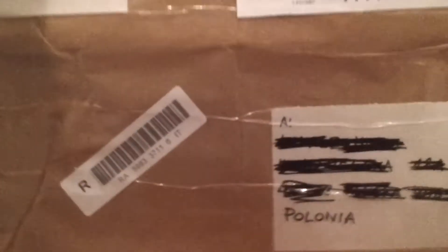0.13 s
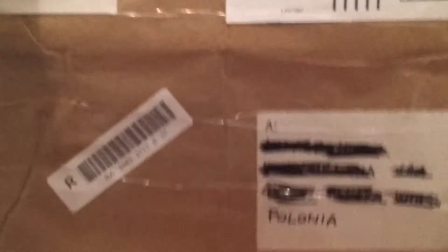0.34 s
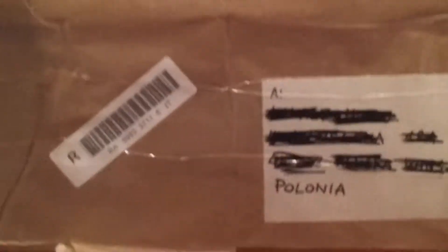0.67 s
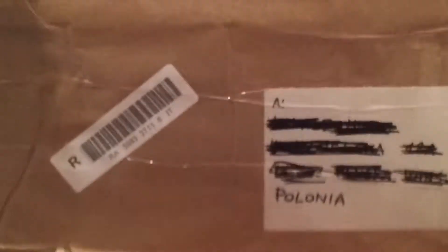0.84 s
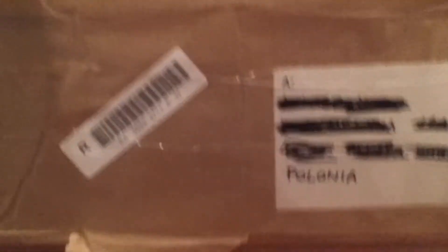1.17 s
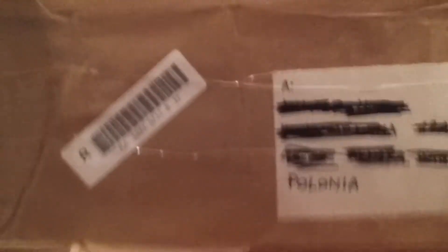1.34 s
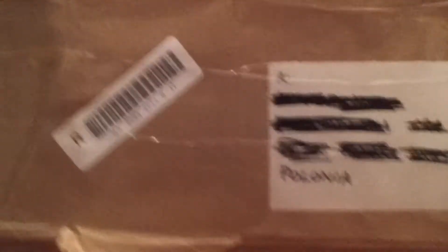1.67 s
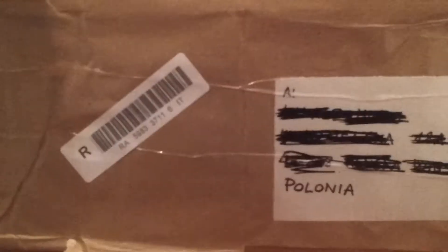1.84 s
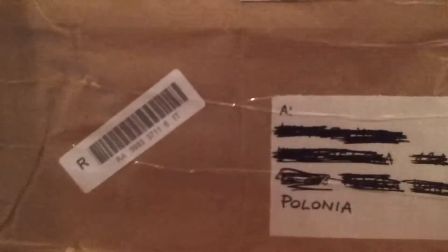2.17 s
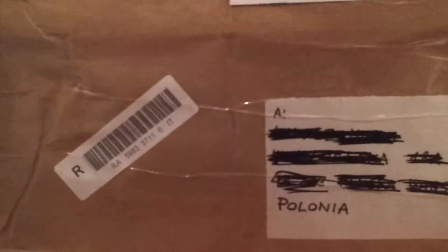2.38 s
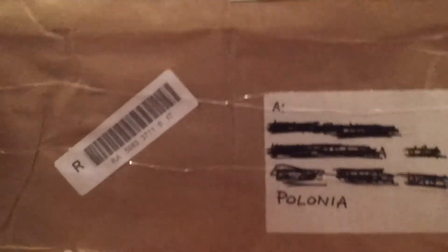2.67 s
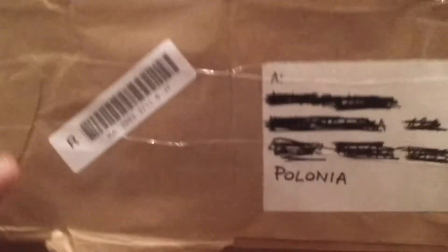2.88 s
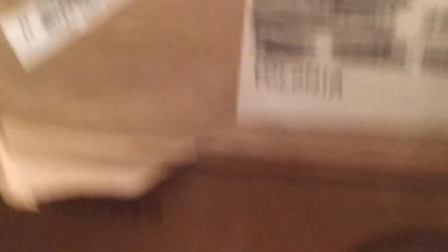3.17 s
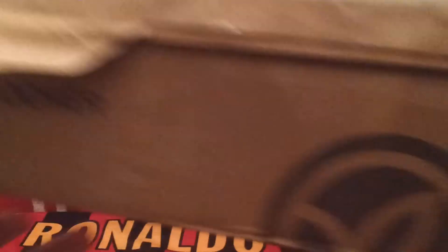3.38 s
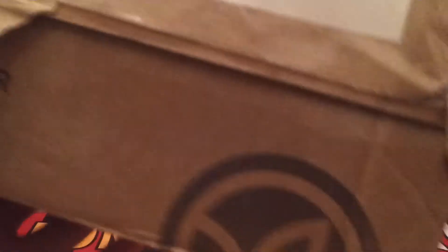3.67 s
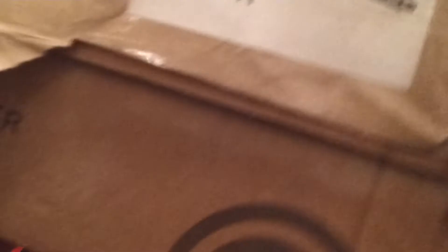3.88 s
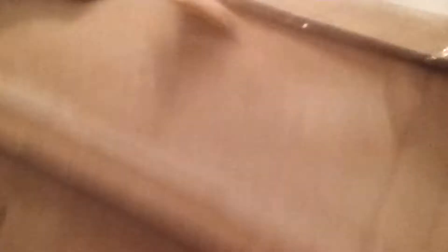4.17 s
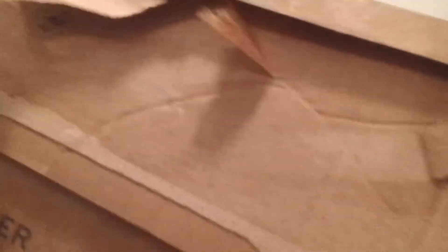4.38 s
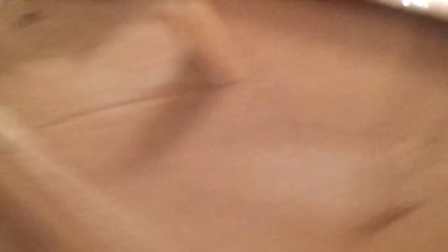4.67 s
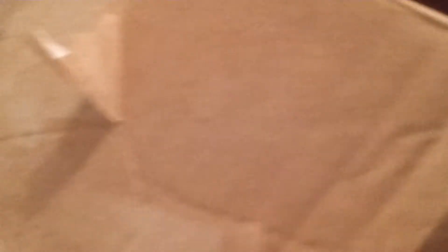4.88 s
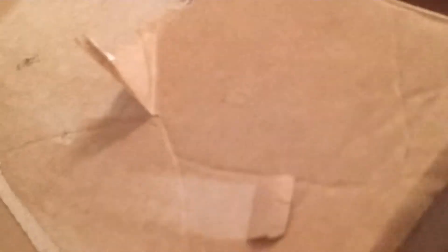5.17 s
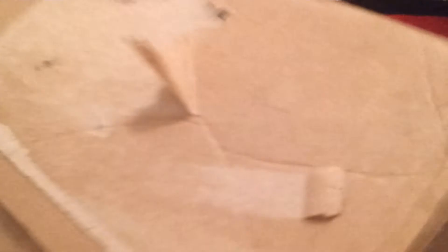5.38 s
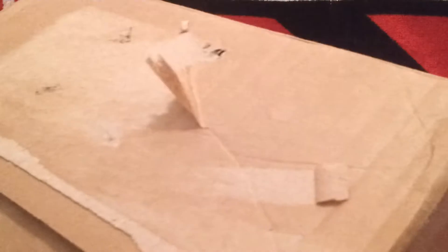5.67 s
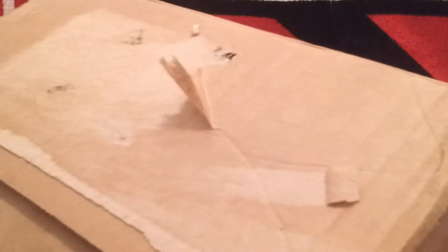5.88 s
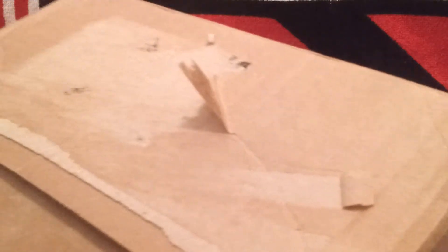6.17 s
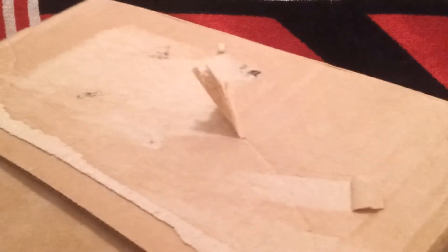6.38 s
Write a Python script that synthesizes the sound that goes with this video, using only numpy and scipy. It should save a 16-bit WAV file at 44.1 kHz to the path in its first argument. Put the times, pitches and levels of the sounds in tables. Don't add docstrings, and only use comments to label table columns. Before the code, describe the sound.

Hands pull tape and brown paper from a hollow box, heard close in stereo. Busy dry crackling opens, followed by separate snapping tugs, brittle pops and low, faint table bumps. A dense harsh rip arrives past the middle, then the crackle thins to a near lull, small high flicks tick, and two crisp cracks finish. Soft room noise and short hard echoes surround it.

```python
import sys
import numpy as np
from scipy import signal
from scipy.fft import rfft, irfft
from scipy.io import wavfile
from scipy.ndimage import uniform_filter1d

SR = 44100
rng = np.random.default_rng(int(sys.argv[2]) if len(sys.argv) > 2 else 0)


def linear_from_db(decibels):
    return 10 ** (np.asarray(decibels, float) / 20)


def to_wav(sig):
    pcm = np.clip(np.atleast_2d(sig), -1, 1) * 32767
    pcm = np.round(pcm).astype(np.int16)
    wavfile.write(sys.argv[1], SR, pcm.T)


N = 287840

# (time [s], crackle [dB], fade [dB/s], box over crackle [dB], tape fizz over crackle [dB])
TUGS = [(0.7298, -22, 130, -7, -31.5), (1.092, -16, 261.5, -4, -47), (1.157, -18.5, 145, -0.5, -35.5),
        (1.281, -18, 122, -6, -43), (1.4198, -24, 40, 1, -37), (1.507, -20, 165, 1, -38.5),
        (1.765, -23.5, 183, -1, -27.5), (1.9884, -16.5, 113, -14.5, -8.5), (2.0723, -19, 75, -20.5, -10),
        (2.2717, -24, 57, -11, -17), (2.424, -18, 20, -5.5, -16), (2.6162, -12, 82, -12.5, -28),
        (2.7803, -13, 200, -13, -22), (2.7935, -14, 170, -12, -22), (2.83, -14, 119, -7, -30),
        (2.845, -13.5, 150, -6.5, -25), (3.0095, -21.5, 118, -5.5, -41), (3.1332, -25.5, 183, 3, -21),
        (3.31, -14.5, 184, -26, -40), (3.59, -19.5, 44, -8, -23), (3.8778, -16, 140, -2, -32.5),
        (3.9788, -23, 4, -2.5, -15), (4.622, -19.5, 18, -5.5, -18), (4.11, -9, 30, -4, -8),
        (4.15, -9.5, 30, -5, -8), (4.684, -17.5, 13, -7, -1.5), (5.33, -32, 90, -7, -10),
        (5.545, -35, 90, 1, -15), (5.6036, -30, 63.5, -6, -10.5), (5.65, -33, 30, -6, -12),
        (5.712, -31, 120, -9, -4), (6.3096, -14.5, 81.5, -8, -36.5), (6.4373, -13, 150, -9.5, -17)]
# (time [s], swell [s], crackle [dB], fade [dB/s], tape fizz over crackle [dB])
PULLS = [(0.0, 0.01, -16.5, 38, -17), (.04, 0.032, -14.5, 32, -10), (0.124, 0.026, -21, 100, -17),
         (0.215, 0.024, -11, 27.5, -13), (.275, 0.027, -17.5, 19.5, -17), (.335, 0.056, -13, 43, -7),
         (.52, 0.033, -14, 92, -11.5), (0.84, 0.012, -15.5, -1, -16), (.868, 0.0087, -11.5, 250, -13),
         (.905, 0.0064, -14.5, 172, -10), (.995, 0.013, -17, 0, -3), (1.006, 0.014, -13, 129, -6.5),
         (1.605, 0.011, -23, 45, -16), (1.67, 0.008, -27, 161.5, -34), (1.945, 0.014, -20.5, 1, -13),
         (1.972, 0.013, -18, 0, -6), (2.45, 0.24, -15, 10, -57), (2.86, 0.027, -18.5, 44, -35.5),
         (3.15, 0.038, -27, 60, -10), (3.215, .02, -37, 44, -30), (3.338, .025, -21.5, 60, -0.5),
         (3.385, 0.012, -28.5, 154, -4), (3.535, 0.011, -34, 60, -3), (3.68, 0.015, -22.5, 120, -15),
         (3.745, 0.034, -23, 65, -6.5), (3.83, 0.054, -18, 0, -15), (3.93, .02, -22, 20, -29),
         (4.02, 0.0336, -18, 5, -8), (4.051, 0.0044, -7, 20, -5), (4.2, 0.12, -16.5, 2.5, -22),
         (4.543, 0.0083, -23, -2, -17), (4.81, 0.14, -22, 7, -7), (4.9, 0.12, -20.5, 18, 1),
         (5.055, 0.018, -17, 150, -4), (5.1, .015, -22, 98, -4.5), (5.95, 0.0137, -38.5, 15.5, 6.5),
         (6.09, 0.016, -33, 91, -1), (6.28, 0.0312, -27.5, 5, -12)]
TUG_SWELL_S, OPENING_DROP_DB = 0.00099, -3
PULL_BOX_DB, PULL_TAUT_DB, TUG_TAUT_DB = -8.5, -17, -26
FADE_SHARE = (0.9, 0.49, 1.03, 1, 4.4)
# (time [s], left-right [dB], nearness to box hollow [dB])
PLACE = [(0.0, -2, -19), (.5, -1.5, -9.5), (.9, -0.42, -6), (1.71, -0.5, -1.5), (2.07, 3, 6),
         (2.25, 9, 9.5), (2.45, 0.5, -5.5), (3.2, -1, -0.5), (3.45, 0, -27), (3.8, -2.5, 2),
         (3.9, -2, -6.5), (4.34, 1, -20), (4.58, -1, -8), (5.4, 0, -12), (6.29, 4, -23), (6.53, 0.5, -31.5)]
# (centre [Hz], width [Hz], level [dB])
SHEET = [(2025, 920, -1), (3280, 2700, -3.5), (4650, 2250, -1), (7560, 970, -12)]
# (centre [Hz], width [Hz], level [dB])
BOX_WALL = [(670, 79, -3), (869, 337, 2), (1100, 300, 0)]
# (centre [Hz], width [Hz], level [dB])
BOX_AIR = [(200, 72, -1), (310.4, 17, 14), (339, 290, -3), (353, 41, 10)]
# (centre [Hz], width [Hz], level [dB])
FIZZ = [(7400, 6800, 1.5), (13200, 1800, -5)]
# (centre [Hz], width [Hz], level [dB])
TAUT = [(4500, 2300, 0)]
# (frequency [Hz], density [dB/Hz])
HUSH = [(18, -53), (30, 19), (240, -4), (312, -1.5), (581, -5), (794, -1.5), (1200, -7.5), (4420, -7),
        (12200, -15.5), (15000, -16)]
HUSH_DB = -28
# (time [s], peak [dB], frequency [Hz], t60 [s])
HUMS = [(0.36, -11.5, 4620, 0.74), (1.508, -15, 2230, 0.11), (.53, -19, 878.6, 1),
        (2.785, -11, 1020, 0.076), (0.912, -14.5, 308, 0.36), (1.016, -10.5, 4600, 0.23),
        (2.08, -19, 1020, 0.41), (2.099, -20, 3980, 0.97), (2.277, -16.5, 1850, 0.392),
        (3.355, -8, 4460, 0.16), (3.615, -19, 1270, .15), (2.786, -13, 880, 0.1), (.875, -16, 4600, .08),
        (4.525, -9.5, 4300, 0.11), (4.06, -19, 294, 0.36), (3.601, -21, 1210, 0.325),
        (4.03, -17.5, 293, 0.29), (4.69, -13, 4800, 0.25), (6.32, -12, 960, 0.25), (3.855, -16, 310, 0.29),
        (4.686, -10, 4100, .25), (2.03, -23, 6300, 1.2), (2.28, -23, 2980, 0.37), (.052, -13.5, 4760, 0.34),
        (.735, -16, 2000, 0.14)]
# (time [s], peak [dB], frequency [Hz], t60 [s], left-right [dB])
FLECKS = [(.44, -2.5, 1810, 0.033, 1), (0.539, -11, 1100, .03, 0), (0.621, -9, 1900, .03, 0),
          (1.434, -4, 2000, 0.018, -2), (1.5083, -3, 1900, .015, -2), (1.622, -18, 7500, .03, 0),
          (1.655, -22, 8500, .03, 2), (1.835, -20, 6000, .02, 0), (1.888, -19.5, 6000, .02, 0),
          (1.984, -6.5, 9300, 0.026, -4), (2.858, -9, 1500, 0.023, -5), (2.9, -12, 1200, .03, 0),
          (3.3122, -1, 4670, 0.017, -3), (3.5917, -5, 3520, 0.016, -2), (1.0897, -0.5, 3500, .02, -6),
          (1.1588, -6, 1910, 0.034, -4), (3.1318, -1.5, 2360, .02, -7), (5.6057, -11.5, 2500, 0.028, 5),
          (6.049, -19, 1800, .01, 0), (4.482, -0.5, 4500, .012, -1), (4.77, -8, 8000, .03, -5),
          (5.6919, -20, 7500, .02, -5), (5.7136, -11.5, 7300, 0.044, -3), (6.0481, -12, 3960, 0.009, -4),
          (6.0885, -22, 7790, .02, -2), (6.1733, -19, 7120, .02, -3), (6.2167, -16, 7470, .025, -4),
          (6.3985, -10, 8300, 0.018, -2), (.7312, -8, 2400, .025, -2), (2.2628, -8, 9000, 0.011, 6),
          (2.2628, -7, 3580, .01, 9), (2.274, -7.5, 2180, 0.013, 7), (2.274, -14, 8000, .012, 8),
          (2.4089, -5, 8000, .012, -2), (2.578, -10, 3000, .02, 0), (4.682, -2, 4100, .04, -4),
          (1.4182, -9, 3200, .02, -3.5), (2.545, -14, 6000, .015, 0), (2.779, -1, 5300, 0.028, 2),
          (2.619, -0.5, 2150, .05, -5)]
# (time [s], peak [dB], frequency [Hz])
BUMPS = [(0.6, -45, 117), (.85, -49, 105), (1.39, -46, 105), (1.003, -21.5, 178.7), (1.448, -30.5, 176),
         (1.988, -36.5, 156), (2.618, -34.5, 200), (3.129, -44, 105), (3.329, -49, 198.4),
         (4.051, -42, 123), (4.108, -33, 191), (4.478, -54, 198), (5.051, -58, 187)]
# (time [s], length [s], level [dB], frequency [Hz])
STIRS = [(0.663, .1, -60, 80), (1.03, 0.33, -53, 80), (1.44, 0.27, -54, 70), (1.78, 0.11, -56, 70),
         (1.94, .1, -48, 70), (2.24, .14, -54, 60), (2.4, .08, -54, 70), (2.592, .07, -46, 70),
         (2.76, .06, -59, 70), (2.99, .06, -54, 70), (3.107, .07, -48, 70), (3.276, .12, -58, 60),
         (3.618, 0.15, -70, 80), (3.85, .09, -56, 110), (4.043, 0.16, -49, 60), (4.45, .08, -58, 60),
         (4.627, .1, -60, 70), (5.01, 0.075, -49, 80), (5.13, 0.31, -58, 60), (5.84, 0.21, -61, 70),
         (6.282, .1, -55, 70), (6.398, .08, -60, 70), (.78, .14, -64, 80), (5.43, .12, -63, 70),
         (5.6, .2, -66, 80), (6.1, .15, -68, 70), (1.58, .1, -62, 90), (2.48, .1, -57, 80)]
# (time [s], peak [dB], sheet ring [Hz], room tail [dB], left-right [dB])
SNAPS = [(.7314, -4.5, 1870, 3.5, -1), (1.0953, -1, 2280, -3, 6), (1.1594, -1.5, 1770, -3, 1.5),
         (1.2835, -8, 2220, 4.5, 6), (1.4198, -8, 2110, 8.5, -3), (1.769, -10.5, 1950, 5, 0),
         (1.9889, 1.5, 2160, -4, -2), (2.0728, 0, 1700, -2.5, 1.5), (2.2631, -9, 3020, -19.5, 6.5),
         (2.4095, -11.5, 6260, -7, -15), (2.4272, 1, 3260, -2, -4), (2.6165, 5.5, 2070, -8, -3),
         (2.7814, -3, 1010, -10.5, 4.8), (3.0097, -2.5, 1485, 1.5, 1.5), (3.1322, -3, 1920, -1.5, 0),
         (3.3122, -4.5, 3850, -1, 3), (3.5925, -7.5, 1100, 5, -4), (3.8805, -1, 3420, -4, 1),
         (3.8954, 0, 1470, 5, -1), (4.0539, 7, 4180, -7, -7), (4.6832, -1, 4270, -10, -3),
         (5.6056, -8, 3400, -7, 7), (6.3116, -4.5, 3000, -9, 10), (6.4362, 0, 5070, 2.5, 3)]
# (time [s], peak [dB], sheet ring [Hz], left-right [dB])
CRACKS = [(0.8463, -19, 1000, -3), (1.39, -14, 980, 0), (2.794, -2.5, 4740, 2.36), (2.846, -11, 3500, -8),
          (0.877, -11, 4500, -9), (1.0895, -2, 2240, -1), (1.434, -8, 1010, 2), (1.453, -6.5, 1030, -1),
          (1.5078, -3, 1100, 2), (2.2742, -10.5, 1830, 16), (2.53, -3.5, 1690, -4.5),
          (2.574, -26, 2100, -1), (2.831, -6.5, 2150, -5), (2.9795, -8, 1060, -5), (3.576, -12.5, 1020, -2),
          (3.6476, -8, 4400, -1), (3.9787, -4.5, 1060, -1), (4.481, -9, 3080, -11.5), (4.507, -8, 3040, -8),
          (4.528, -13, 4350, -6), (4.624, -14.5, 4200, 2.5), (4.806, -0.5, 4630, -0.98),
          (5.069, -0.5, 4040, 8), (5.5493, -16, 1000, -7), (5.689, -21.5, 4920, 0.5),
          (5.7144, -17, 3000, -2.5), (6.049, -13.5, 3920, 0), (6.218, -21, 1150, -4.5),
          (6.3883, -7, 3380, 7), (6.398, -19.5, 1010, 6)]
CRACK_TAIL_DB, KNOCK_DB = 0.5, -7
# (time [s], peak [dB], left-right [dB])
POPS = [(1.284, -9, -1.5), (1.5075, -10, -3.0), (2.0737, -4, 0.0), (2.2628, -3, 10), (2.4089, -1, -1.0),
        (2.4444, -5, 3), (2.576, -8, 0.5), (2.7934, -3, 0.5), (2.8444, -2, 0.5), (3.5917, -7, -1.5),
        (3.6461, -6, -6), (4.4807, -2, 2), (4.5072, -5, -2.5), (4.5276, -4, -3), (5.7134, -17, -0.5),
        (6.0482, -8, -1.0)]
# (time [s], peak [dB], upper mode over lower [dB], ring t60 [s], left-right [dB])
TICKS = [
    (5.7994, -22, 6, 0.03, 5),
    (5.8144, -6.5, 1.5, 0.021, 0),
    (5.856, -16, -5, 0.04, 5),
    (5.9468, -16, -17, 0.045, 19),
    (5.966, -14.5, -2, 0.12, -4),
    (6.0013, -8, -17, 0.026, 17),
    (6.0294, -25, 2.5, 0.05, -3),
]
# (lower [Hz], upper [Hz])
TICK_HZ = (6630, 8220)
# (near scatter t60 [s], walls t60 [s], walls [dB], dulling [0-1], first echo [s])
ROOM = (0.36, 0.83, -8.5, 0.53, 0.02)
# (frequency [Hz], likeness [0-1])
SAME = [(60, 0.32), (150, 0.73), (300, 0.594), (600, 0.94), (1200, 0.22), (3000, 0.0084), (15000, 0.0067)]
# (frequency [Hz], left-right [dB])
LEAN = [(60, 3), (130, 4), (290, 2), (640, 0.5), (1400, 1), (3090, -0.5), (5600, 1.5), (8500, -5.5),
        (15000, -5)]
# (start [s], end [s], silent above [Hz])
TOP_LOSS = [(.6, .66, 13200), (1.11, 1.155, 10200), (1.18, 1.22, 13200), (1.4, 1.47, 12800),
            (2.9, 2.94, 13000), (4.5, 4.54, 12200), (2.5, 2.57, 11800), (2.57, 2.61, 10500),
            (2.635, 2.7, 12000), (2.79, 2.9, 11500), (4.26, 4.4, 11400), (4.4, 4.47, 13000),
            (6.32, 6.37, 11800), (6.43, 6.6, 11000)]
LOW_CUT_HZ, BASS_CUT_HZ, EDGE_HZ = 261, 110, 14530
LEFT_LATE_S = 0.0002


def evened(x):
    return x / np.sqrt(np.mean(x ** 2) + 1e-20)


def peaked(x):
    return x / abs(x).max()


def read(points, hz):
    f, value = np.transpose(points)
    return np.interp(np.log(hz + 1), np.log(f + 1), value)


def band(x, low_hz, high_hz, order=2):
    return signal.lfilter(*signal.butter(order, (low_hz, high_hz), "band", fs=SR), x)


def decay(t60_s, size):
    return linear_from_db(-60 * np.arange(size) / SR / t60_s)


def ring(hz, t60_s, size=4096, turn=0):
    t = np.arange(size) / SR
    return decay(t60_s, size) * np.sin(2 * np.pi * (hz * t + turn))


def peaks(modes, hz):
    power = sum(linear_from_db(2 * db) / (1 + (2 * (hz - f) / width) ** 2) ** 2 for f, width, db in modes)
    return evened(np.sqrt(power))


def add(mix, s, sound, pan_db):
    part = mix[:, round(s * SR):][:, :sound.shape[-1]]
    gains = linear_from_db(np.array([[pan_db / 2], [-pan_db / 2]]))
    part += gains * sound[..., :part.shape[1]]


def room(sound, echoes):
    near_t60_s, wall_t60_s, wall_db, dull, first_s = ROOM
    size = echoes.shape[1]
    walls = evened(signal.lfilter([1], [1, -np.clip(dull, 0, .9)], echoes[::-1, ::-1]))
    tail = echoes * decay(near_t60_s, size) + walls * linear_from_db(wall_db) * decay(wall_t60_s, size)
    tail *= np.clip(np.arange(size) / SR / first_s, 0, 1) ** 2
    return signal.fftconvolve(sound, tail / np.linalg.norm(tail[0]), axes=1)


def airborne(x):
    cuts = [signal.butter(4, hz, "high", fs=SR, output="sos") for hz in (LOW_CUT_HZ, BASS_CUT_HZ)]
    return signal.sosfilt(np.vstack(cuts), x)


def strokes():
    t, share = np.arange(N) / SR, np.array(FADE_SHARE)[:, None]
    rows = [(s, TUG_SWELL_S, db, fade, box, fizz, TUG_TAUT_DB) for s, db, fade, box, fizz in TUGS]
    rows += [(s, swell, db, fade, PULL_BOX_DB, fizz, PULL_TAUT_DB) for s, swell, db, fade, fizz in PULLS]
    levels_db = None
    for s, swell_s, db, fade, box_db, fizz_db, taut_db in sorted(rows):
        crest = db + np.array([[0], [box_db], [box_db], [fizz_db], [taut_db]])
        if levels_db is None:
            levels_db = crest - OPENING_DROP_DB + 0 * t
        at = round(max(s, 0) * SR)
        since, swell_s = t[at:] - t[at], max(swell_s, 1 / SR)
        swell = (levels_db[:, [at]] - crest) * np.maximum(1 - since / swell_s, 0)
        levels_db[:, at:] = crest + swell - share * fade * np.maximum(since - swell_s, 0)
    return levels_db


def puff(t60_s, size=4096):
    shape = decay(t60_s, size) ** 2
    return shape / shape.sum()


def fibre_breaks(per_s=3000, spread_db=3.4, clump_db=.3, scatter_t60_s=0.11):
    clumps = evened(uniform_filter1d(uniform_filter1d(rng.standard_normal(N), 300), 300))
    size = linear_from_db(spread_db * np.minimum(rng.exponential(1, N), 3.8) + clump_db * clumps)
    hits = size ** 2 * (rng.random(N) < per_s / SR)
    energy = signal.oaconvolve(hits, puff(scatter_t60_s) + 0.24 * puff(0.006))[:N]
    return evened(np.sqrt(abs(energy)) * rng.standard_normal((2, N)))


def shifting(x, patch_db=1.5):
    hz, t, z = signal.stft(x, SR, nperseg=256)
    patches = rng.standard_normal((len(hz), len(t)))
    patches = evened(uniform_filter1d(uniform_filter1d(patches, 2, 0), 24, 1))
    return evened(signal.istft(z * linear_from_db(patch_db * patches), SR, nperseg=256)[1][:, :N])


def crackle(rumble_db=-62):
    z = rfft(shifting(fibre_breaks()))
    hz = np.fft.rfftfreq(N, 1 / SR)
    sheet_db, wall_db, air_db, fizz_db, taut_db = strokes()
    place_s, place_pan_db, place_hollow_db = np.transpose(PLACE)
    t = np.arange(N) / SR
    pan_db = np.interp(t, place_s, place_pan_db)
    hollow_db = np.interp(t, place_s, place_hollow_db)
    layers = ((SHEET, sheet_db + 0.5), (BOX_WALL, wall_db + 0.27), (BOX_AIR, air_db + hollow_db),
              (FIZZ, fizz_db - .1), (TAUT, taut_db))
    mix = airborne(sum(irfft(z * peaks(modes, hz), N) * linear_from_db(db) for modes, db in layers))
    mix += linear_from_db(rumble_db + sheet_db) * irfft(z * peaks([(95, 40, 0)], hz), N)
    return mix * linear_from_db(np.outer([.5, -.5], pan_db))


def hush():
    z = rfft(rng.standard_normal((2, N))) * linear_from_db(read(HUSH, np.fft.rfftfreq(N, 1 / SR)))
    return linear_from_db(HUSH_DB) * evened(irfft(z, N))


def hums(width_share=0.058, rise_s=0.0031):
    out, t = np.zeros((2, N)), np.arange(SR // 3) / SR
    for s, db, hz, t60_s in HUMS:
        noise = rng.standard_normal((2, len(t)))
        narrow = signal.lfilter(*signal.iirpeak(hz, 1 / width_share, SR), noise)
        add(out, s, evened(narrow) * linear_from_db(db - 60 * t / t60_s) * np.clip(t / rise_s, 0, 1), 0)
    return out


def flecks(span=1.16, echo_db=-9):
    out, size = np.zeros((2, N)), 2048
    for s, db, hz, t60_s, pan_db in FLECKS:
        noise = rng.standard_normal((2, 8192))
        burst = band(noise[:, :size] * decay(t60_s, size), hz / span, hz * span)
        burst = linear_from_db(db) * peaked(burst)
        add(out, s, burst, pan_db)
        add(out, s, linear_from_db(echo_db) * room(burst, noise), pan_db / 2)
    return out


def bumps(t60_s=0.16, rise_s=0.0093, right_share=0.864):
    out, size = np.zeros((2, N)), 8192
    soft = np.clip(np.arange(size) / (rise_s * SR), 0, 1)
    for s, db, hz in BUMPS:
        knock = np.array([ring(hz, t60_s, size), ring(right_share * hz, t60_s, size)])
        add(out, s, linear_from_db(db + 4.5) * soft * knock, 0)
    return out


def stir(span=1.6, lift=1.17):
    out = np.zeros((2, N))
    for s, length_s, db, hz in STIRS:
        edges_hz = (lift * hz / span, lift * hz * span)
        sos = signal.butter(2, edges_hz, "band", fs=SR, output="sos")
        low = signal.sosfilt(sos, rng.standard_normal((2, 16384)))[:, -round(length_s * SR):]
        add(out, s, linear_from_db(db) * evened(low) * np.hanning(low.shape[1]), 0)
    return out


def snaps(knock_t60_s=0.03, crack_hz=(1000, 2600), reach=0.43):
    crack_t60_s, sheet_t60_s, sheet_span = .016, .04, 1.3
    bright_db, brighter = -28, .8
    out, size = np.zeros((2, N)), 4096
    knock = ring(BOX_WALL[1][0], knock_t60_s) + 0.12 * ring(BOX_AIR[1][0], 2 * knock_t60_s)
    rows = SNAPS + [(s, db, hz, CRACK_TAIL_DB, pan_db) for s, db, hz, pan_db in CRACKS]
    for s, db, hz, tail_db, pan_db in sorted(rows):
        splinters, echoes = rng.standard_normal((2, 2, 16384))
        burst = splinters[:, :size]
        crack = band(burst, crack_hz[0], crack_hz[1] + reach * hz)
        crack = (crack + linear_from_db(bright_db + brighter * db) * burst) * decay(crack_t60_s, size)
        sheet = band(splinters[:, -size:], hz / sheet_span, hz * sheet_span, order=1)
        sheet = sheet * decay(sheet_t60_s, size)
        sound = 0.83 * peaked(crack) + 0.97 * peaked(sheet) + 0.37 * linear_from_db(KNOCK_DB) * knock
        sound = linear_from_db(db) * sound
        add(out, s, sound, pan_db)
        add(out, s, linear_from_db(tail_db - 3.5) * room(sound, echoes), pan_db / 2)
    return out


def pops(t60_s=0.0055, band_hz=(1500, 6500), trim_db=-0.5):
    out, size = np.zeros((2, N)), 512
    for s, db, pan_db in POPS:
        click = band(rng.standard_normal(size) * decay(t60_s, size), *band_hz)
        add(out, s, linear_from_db(db + trim_db) * peaked(click)[None], pan_db)
    return out


def ticks(click_level=0.55):
    out = np.zeros((2, N))
    for s, db, upper_db, t60_s, pan_db in TICKS:
        modes = ring(TICK_HZ[0], t60_s) + linear_from_db(upper_db) * ring(TICK_HZ[1], 2.3 * t60_s)
        click = band(rng.standard_normal((2, 4096)), 6800, 11500) * ring(50, 0.011, turn=0.28)
        add(out, s, linear_from_db(db) * (.5 * modes + click_level * 1.5 * click), pan_db)
    return out


def scene():
    by_air = airborne(hush() + hums() + snaps() + ticks())
    return crackle() + by_air + flecks() + bumps() + stir() + pops()


def thinned_treble(x, margin_db=-20, jitter_db=9.5, from_hz=10200):
    hz, t, z = signal.stft(x, SR, nperseg=2048)
    power = (abs(z) ** 2).mean(0)
    middle = power[hz < 8000].mean(0)
    band_db = 10 * np.log10(uniform_filter1d(power, 24, 0) / middle + 1e-12)
    band_db = band_db[::16].repeat(16, 0)[:len(hz)]
    luck = rng.standard_normal((len(hz) // 6 + 1, len(t))).repeat(6, 0)[:len(hz)]
    keep = np.clip((band_db - margin_db + jitter_db * luck) / 2, 0, 1)
    for start_s, end_s, top_hz in TOP_LOSS:
        keep[np.ix_(hz > top_hz, (t > start_s) & (t < end_s))] = 0
    keep[hz < from_hz] = 1
    return signal.istft(z * keep, SR, nperseg=2048)[1][:, :N]


def top_cut(x):
    return signal.sosfilt(signal.butter(12, 15550, fs=SR, output="sos"), x)


def record(dry):
    hz = np.fft.rfftfreq(N, 1 / SR)
    left, right = rfft(dry)
    lean = np.arcsin(np.clip(read(SAME, hz), -.95, .95)) / 2
    own, other = np.cos(lean), np.sin(lean)
    pair = np.array([own * left + other * right, other * left + own * right])
    pair *= linear_from_db(np.outer([.5, -.5], read(LEAN, hz)))
    pair /= np.sqrt(1 + (hz / EDGE_HZ) ** 160)
    pair[0] *= np.exp(-2j * np.pi * hz * LEFT_LATE_S)
    mix = np.clip(thinned_treble(irfft(pair, N)), -1, 1)
    return top_cut(mix)


dry = scene()
out = record(dry)
to_wav(out)
```